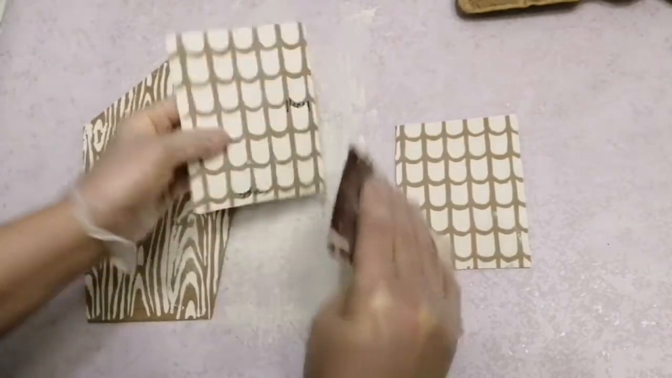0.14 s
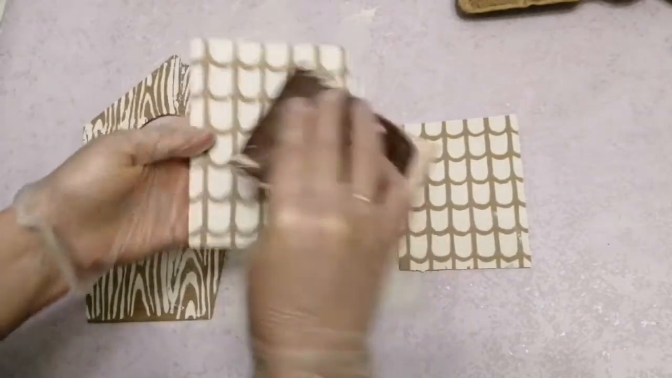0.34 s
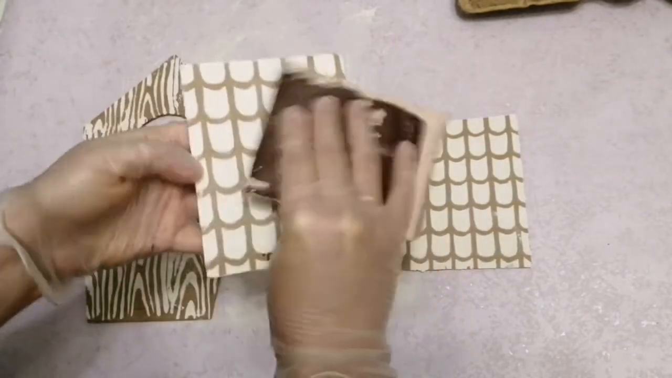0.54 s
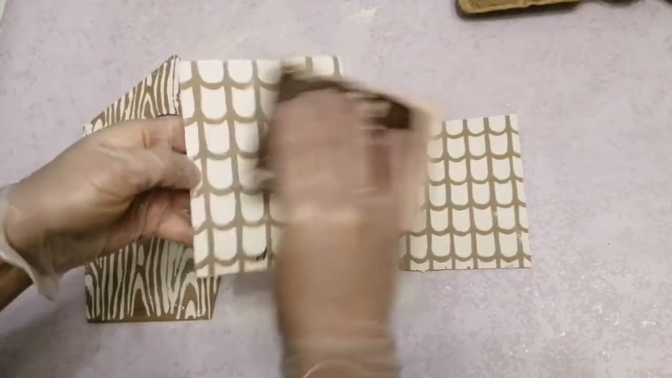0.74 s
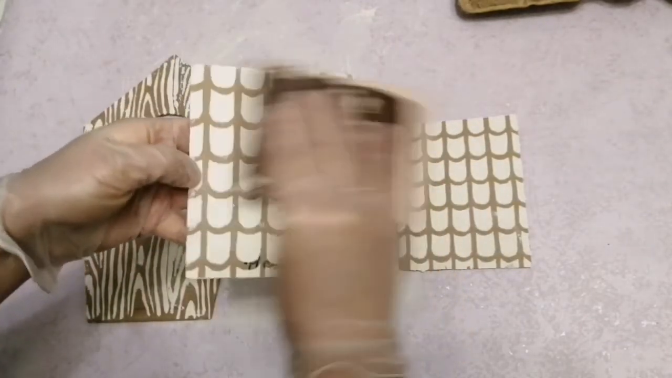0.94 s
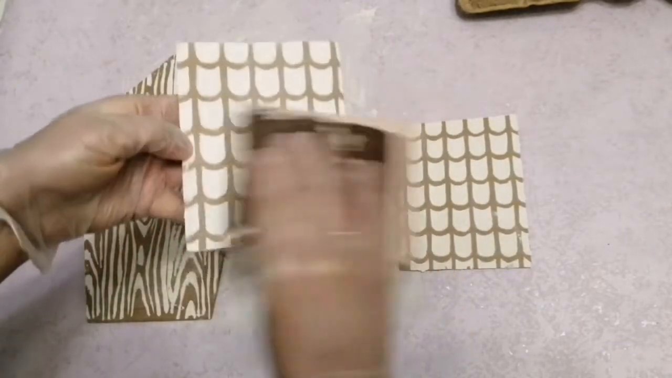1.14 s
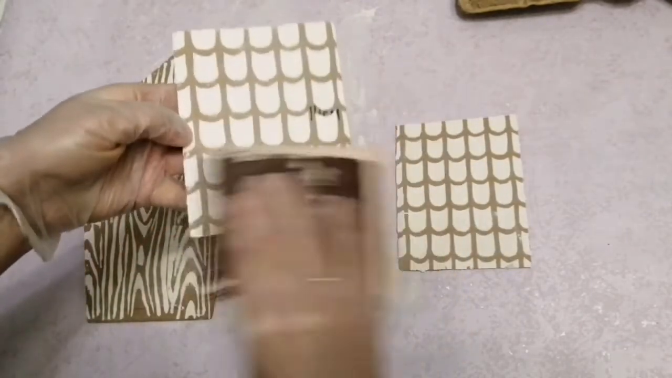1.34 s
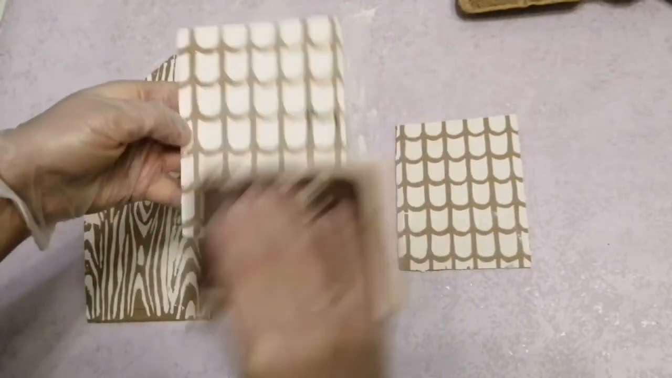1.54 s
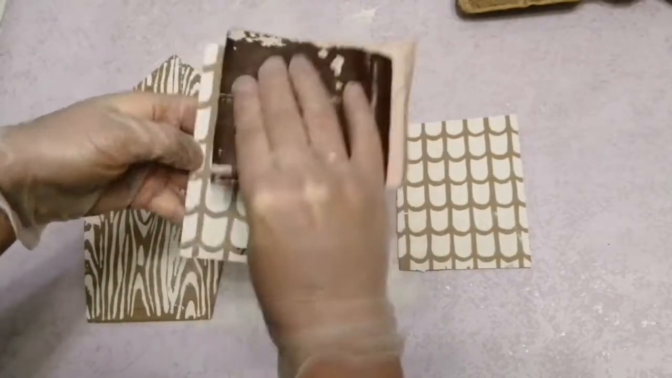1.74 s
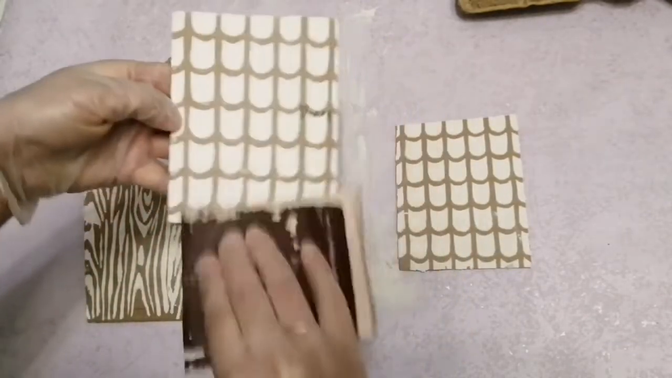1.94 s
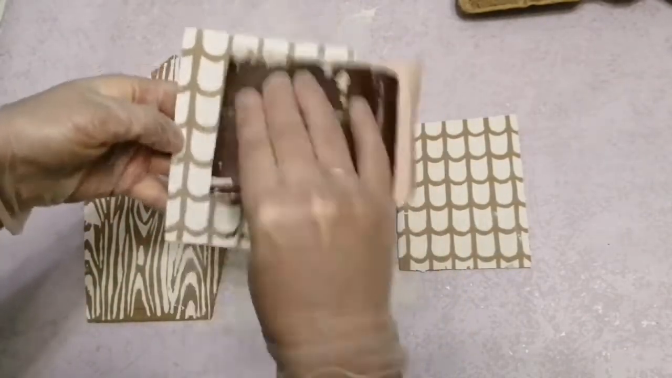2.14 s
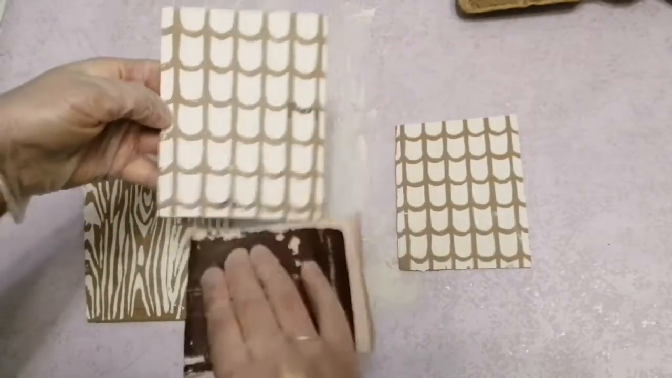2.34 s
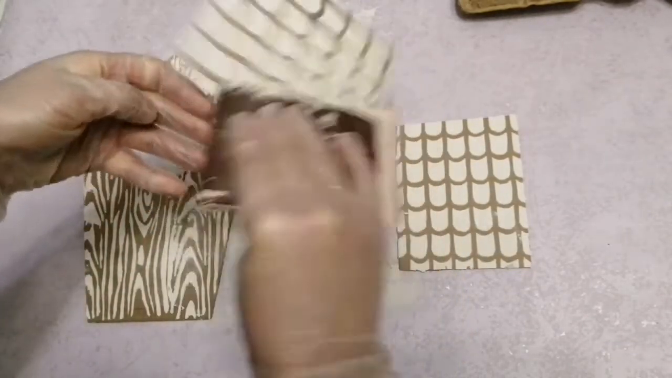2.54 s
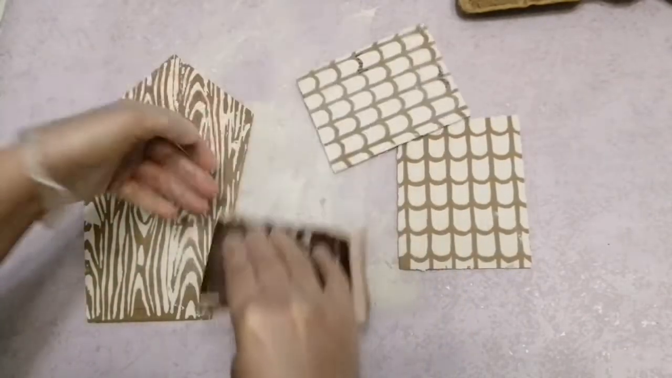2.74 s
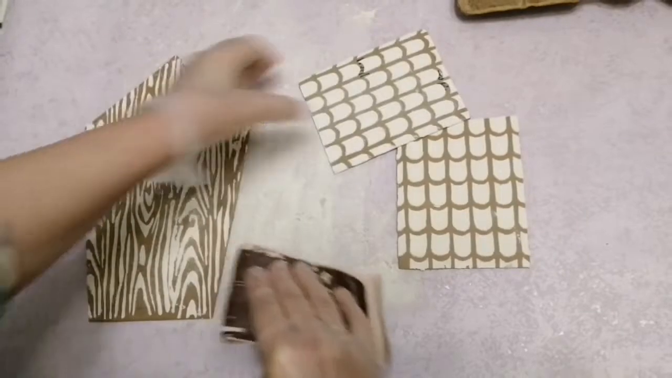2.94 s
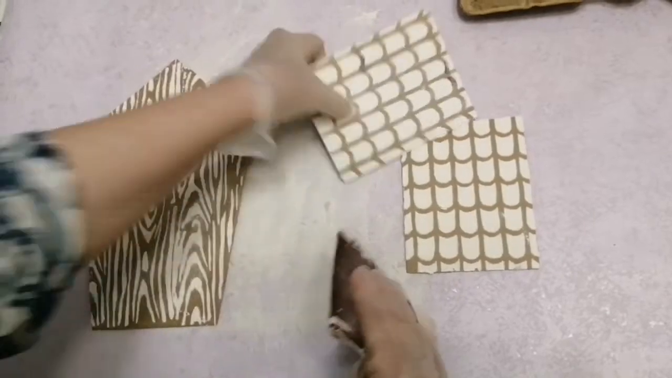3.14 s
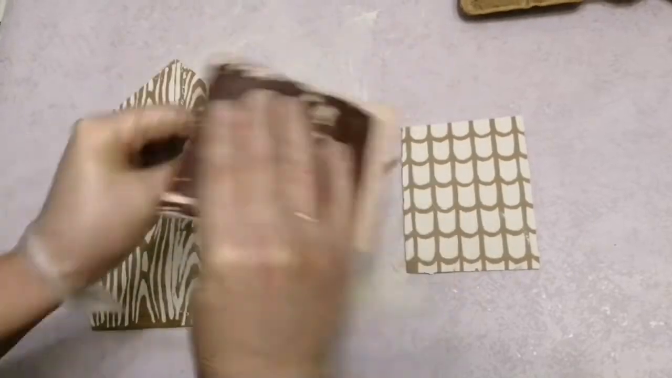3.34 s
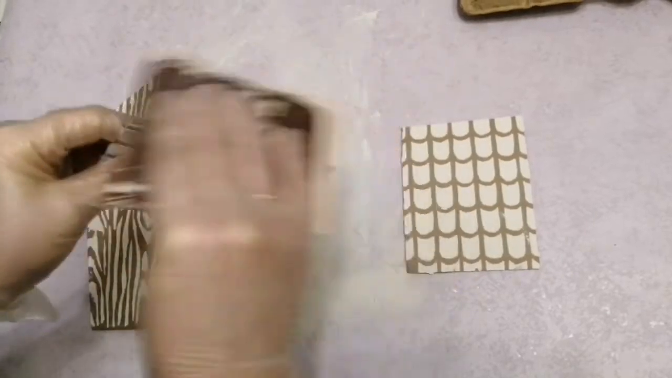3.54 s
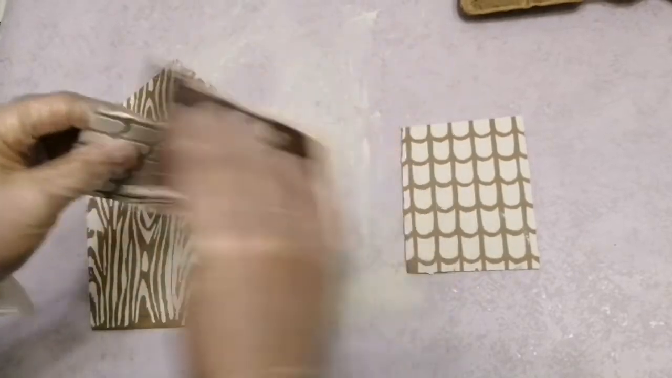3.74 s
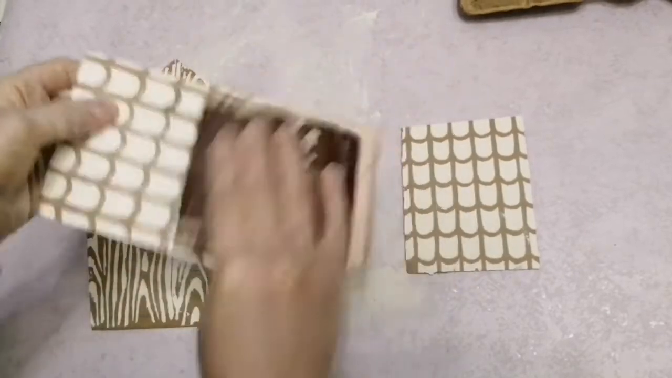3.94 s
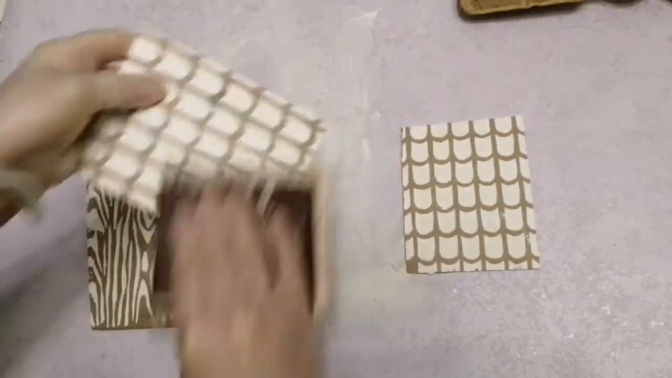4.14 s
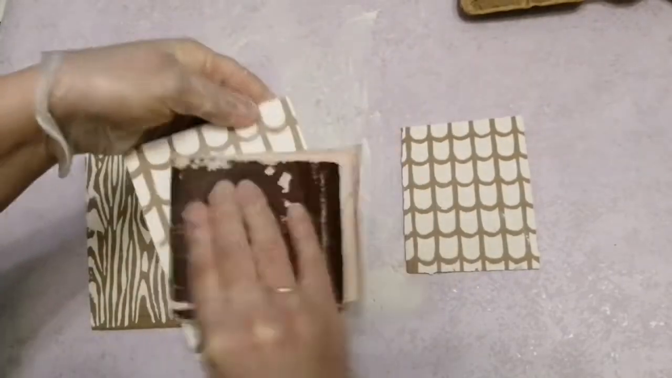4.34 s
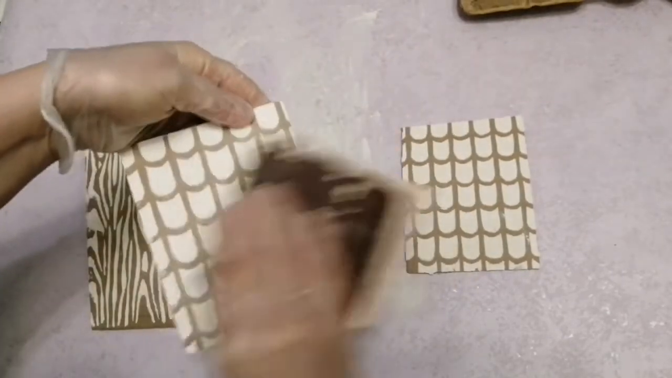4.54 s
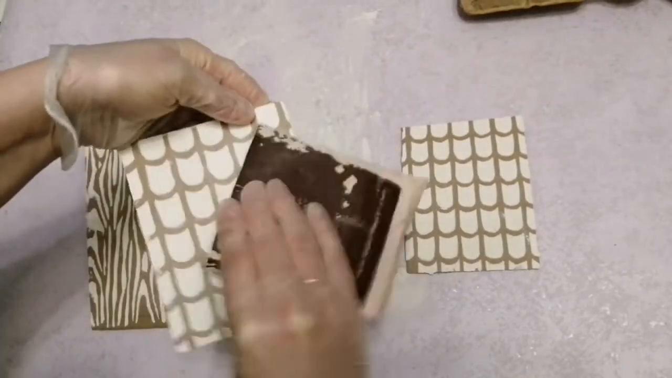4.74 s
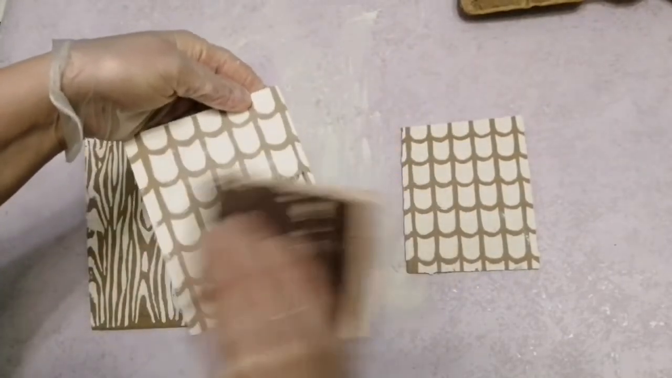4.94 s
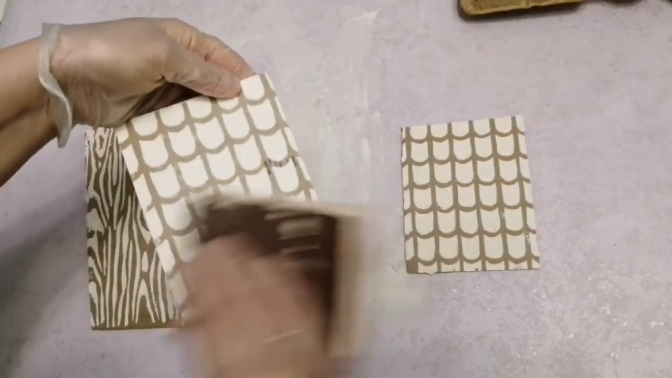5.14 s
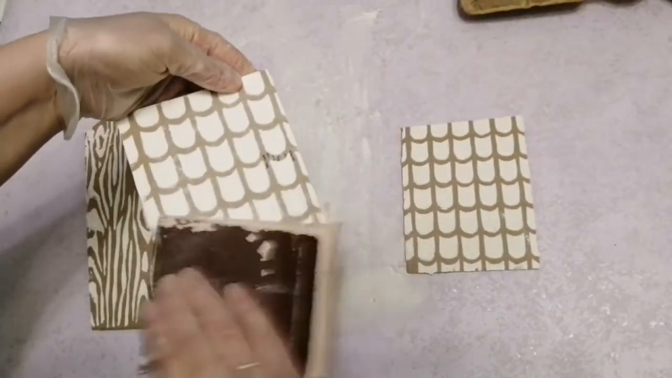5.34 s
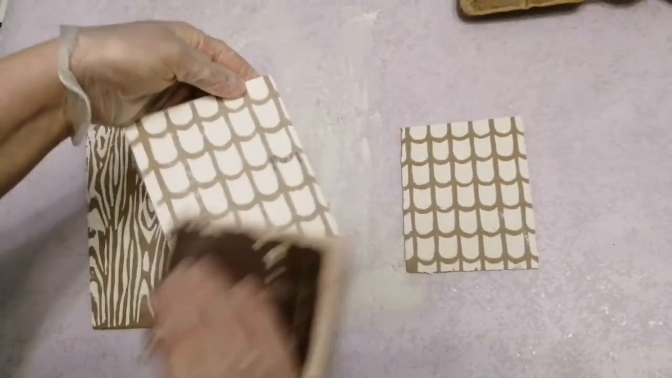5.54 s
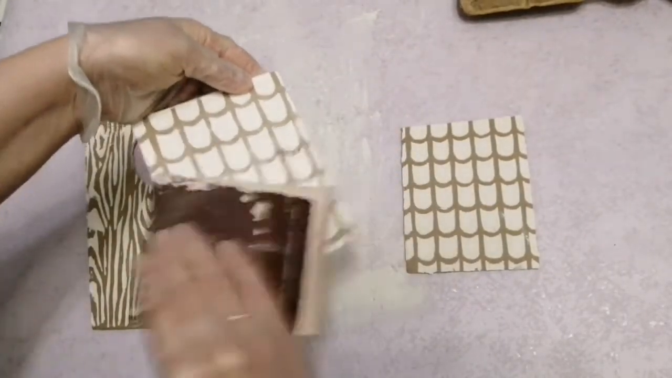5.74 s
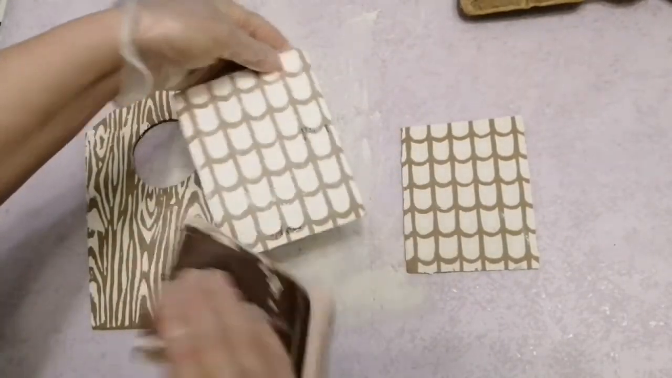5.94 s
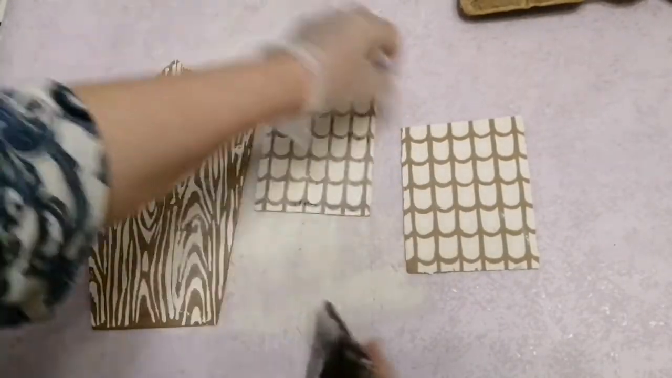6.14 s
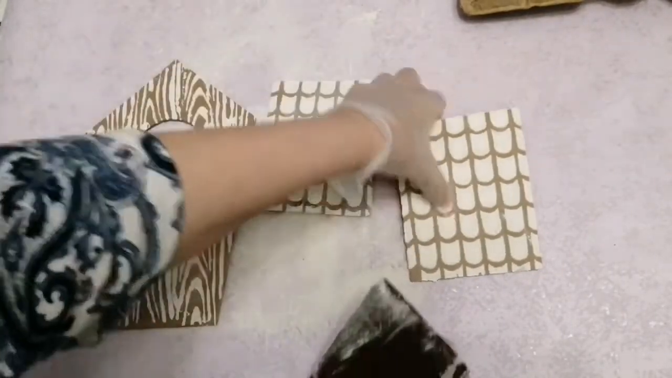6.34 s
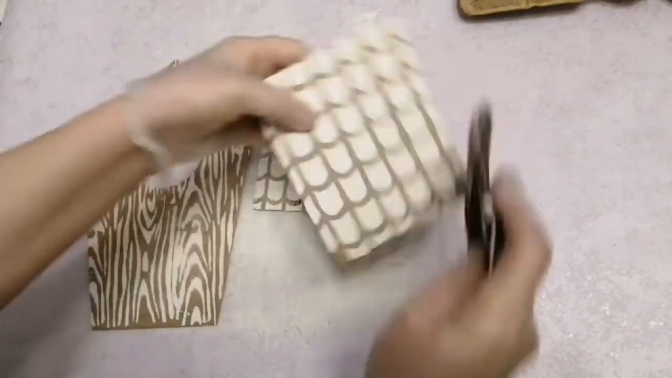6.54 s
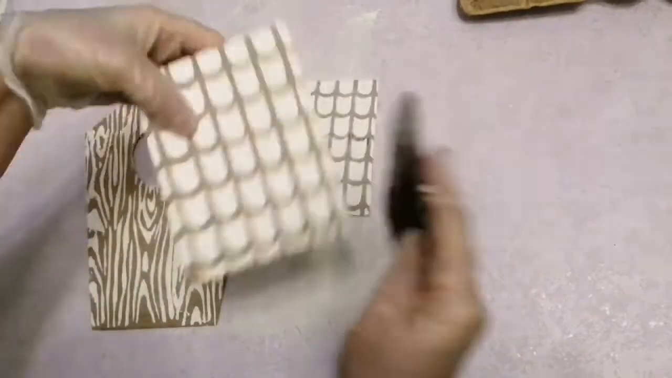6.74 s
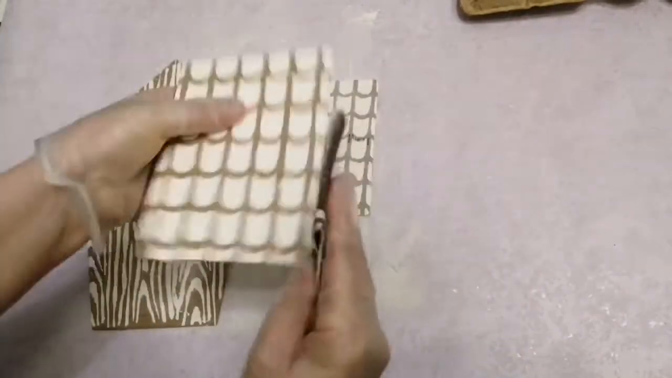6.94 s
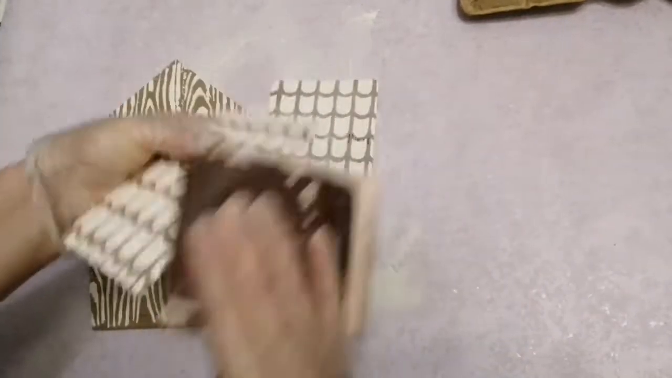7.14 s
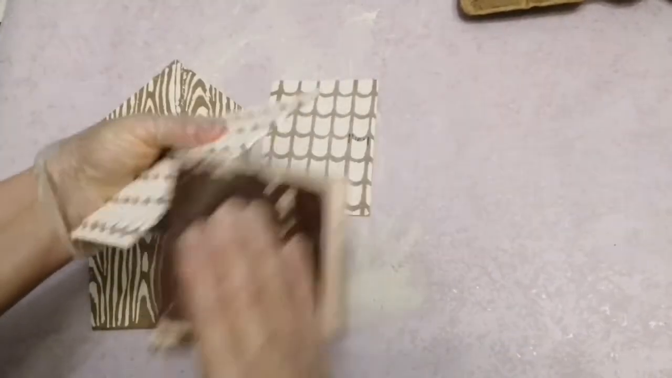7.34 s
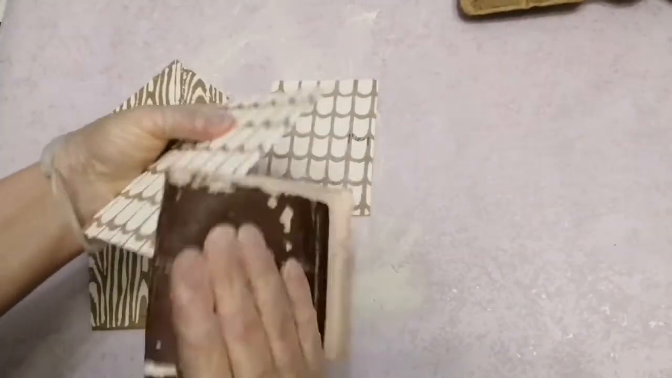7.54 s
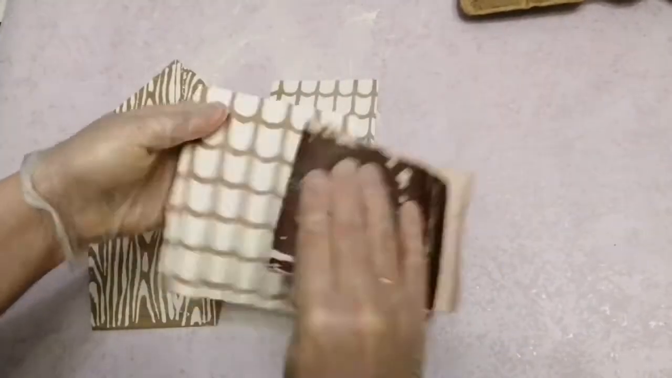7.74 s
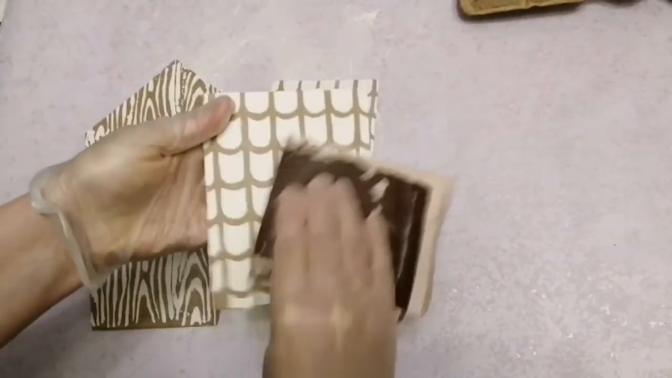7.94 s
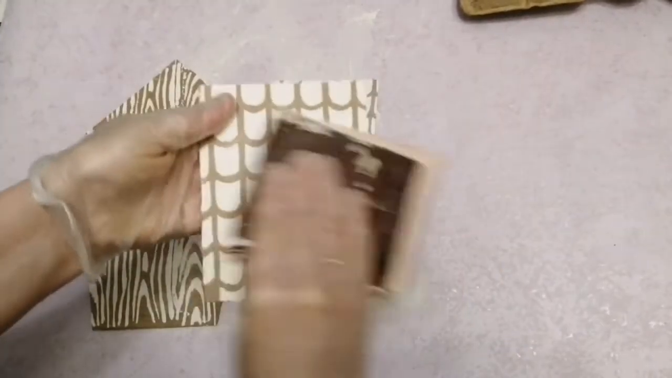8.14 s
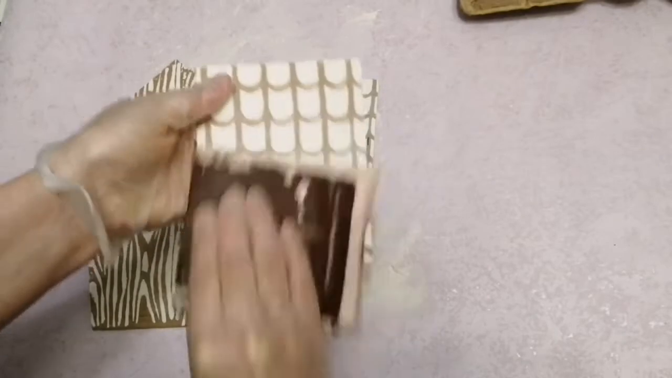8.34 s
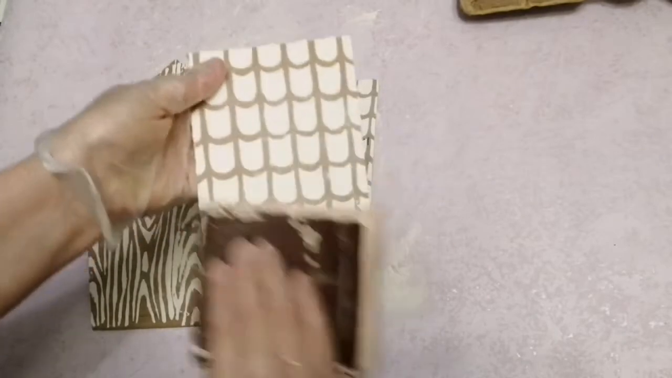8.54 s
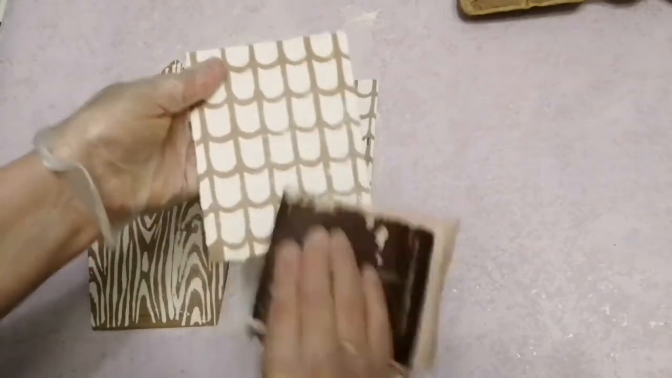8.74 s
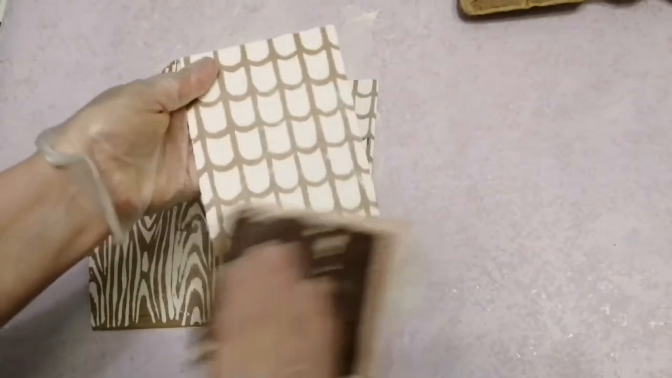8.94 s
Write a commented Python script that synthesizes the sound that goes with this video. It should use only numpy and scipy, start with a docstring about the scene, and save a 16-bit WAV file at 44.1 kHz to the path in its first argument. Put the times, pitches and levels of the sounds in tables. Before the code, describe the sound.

Close stereo sound from above a table in a small quiet room. Sandpaper rubs puttied cardboard in dry, grainy hissing strokes, quick at first, then slower and longer. A pause brings knocks and sliding card. Separate short scrapes follow, then a very fast scrubbing run, another quiet pause with faint handling, and a last bout of uneven, medium-paced strokes.

```python
"""A dry, grainy hiss swells and fades with each stroke of sandpaper over dried putty on cardboard.
Friction breaks many tiny grains loose: the grains hiss, the sheet rasps and the card drums beneath.
Around the bouts of rubbing come light slides, knocks, low drones, ticks of grit and a faint squeak.
Decaying modes make the knocks, filtered noise the drones, and a wavering sine the squeak.
A small room adds reflections and still air; a microphone with two ports hears it all from above."""
import sys
import numpy as np
from scipy import signal
from scipy.fft import rfft, irfft, next_fast_len
from scipy.io import wavfile

SR = 44100
rng = np.random.default_rng(int(sys.argv[2]) if len(sys.argv) > 2 else 0)


def log_audio(samples):
    """Write samples as a 16-bit WAV file to the path given in sys.argv[1]."""
    # one column per channel
    frames = np.atleast_2d(samples).T
    # limit to full scale, then quantise
    limited = np.clip(frames, -1, 1)
    pcm = np.round(limited * 32767).astype(np.int16)
    wavfile.write(sys.argv[1], SR, pcm)


N = 396018
TIME = np.arange(N) / SR  # s
SIZE = next_fast_len(N + SR // 10, real=True)  # padded transform length, samples
FREQ = np.maximum(np.fft.rfftfreq(SIZE, 1 / SR), 1)  # Hz
BODY_HZ, HISS_HZ = 827, 3850  # where card body, rasp and hiss meet

# strokes of the sandpaper, each lasting to the next turn or stop: start_s [s], level_db [relative dB]
STROKE_TABLE = [(0.39, -38.5), (0.489, -31.5), (0.604, -33), (0.713, -33.5), (0.818, -31), (0.921, -29.5),
                (1.028, -28.0), (1.143, -27.5), (1.231, -27.5), (1.349, -26.5), (1.42, -28), (1.795, -27.5),
                (2.206, -27), (3.398, -36.5), (3.587, -35), (3.75, -31), (3.955, -28), (4.129, -28.5),
                (4.333, -29.5), (4.382, -32), (4.486, -34.5), (4.56, -29), (4.608, -31), (4.676, -31),
                (4.738, -32.5), (4.785, -33.5), (4.844, -29.5), (4.882, -30), (4.953, -29.5),
                (5.004, -31.5), (5.065, -29), (5.119, -28.5), (5.165, -29.5), (5.219, -31), (5.272, -28),
                (5.315, -30), (5.372, -30.5), (5.419, -33), (5.469, -32.5), (5.503, -33), (5.571, -34),
                (5.616, -30.5), (5.663, -37.5), (5.725, -29.5), (5.77, -30), (5.802, -33.5), (7.011, -41),
                (7.087, -40), (7.233, -34.5), (7.336, -34.5), (7.477, -38.5), (7.583, -33.5),
                (7.826, -31.0), (7.914, -30), (7.976, -29.5), (8.153, -27.5), (8.309, -30), (8.477, -29),
                (8.632, -32.5), (8.783, -35), (8.869, -28), (8.92, -35.5)]
# moments when the hand comes to rest: stop_s [s]
HAND_STOPS = [1.54, 2.015, 2.395, 3.507, 3.671, 3.842, 4.041, 4.215, 5.883, 7.7, 9.058]
# how the held card answers the rubbing, damped when pressed on the table:
# time_s [s], rasp_db [dB], body_db [dB], middle_ring_db [dB, BODY_HZ to 2 kHz], upper_ring_db [dB, above]
CARD_HOLD = [(.4, -1.5, -2.5, 3, -6), (1.2, -1, -2, 0.5, 5), (2.3, -0.5, -2, 3, 5), (3.45, 1, 3, -19, 5),
             (4.2, 0, 2.5, -6, -15), (4.45, -2.5, -9, -6, -10.5), (5.9, -2.5, -6, -0.5, -6),
             (7.1, -0.5, 4, 6.5, -5), (7.65, -1, 0.5, 12.5, -5), (8.05, 0, 0, -3, 2.5),
             (9, -1, -0.5, 8.5, -5)]
# a firmer stroke mainly hisses more: rasp and body rise by these dB per dB from their usual levels
USUAL_DB, RASP_DB, RASP_RISE, BODY_DB, BODY_RISE = -30.5, -34, 0.76, -47, 0.15
TURN_SHARE = 0.052  # the hand swings round in an oval: a turning stroke runs on by this share of its length


def strokes():
    """Reciprocating friction: the force of each stroke and the hold of the card set its balance."""
    turns = np.sort([start for start, db in STROKE_TABLE] + list(HAND_STOPS))
    rows = []
    for start, hiss_db in STROKE_TABLE:
        end = turns[turns > start][0]
        hold_rasp_db, hold_body_db = curve(CARD_HOLD, (start + end) / 2)[:2]
        force_db = hiss_db - USUAL_DB
        if end not in HAND_STOPS:
            end += TURN_SHARE * (end - start)
        rasp_db = RASP_DB + RASP_RISE * force_db + hold_rasp_db
        body_db = BODY_DB + BODY_RISE * force_db + hold_body_db
        rows.append((start, end, hiss_db, rasp_db, body_db))
    return rows


# light sliding on the table, of a piece or the resting sheet:
# start_s [s], end_s [s], level_db [relative dB], hiss_db [dB above level_db]
SLIDE_TABLE = [(0.11, 0.437, -61, 9), (2.405, 2.558, -48.5, 1), (2.567, 2.716, -61.5, 6),
               (2.69, 2.716, -38, -0.5), (2.712, 2.8, -43, -4.5), (2.74, 2.89, -50, -8.5),
               (3.049, 3.184, -49.5, 0), (3.168, 3.213, -49.5, 1), (3.18, 3.333, -74.5, 21),
               (6.105, 6.18, -55.5, -4), (6.27, 6.354, -57, 0.5), (6.346, 6.413, -48, 0),
               (6.417, 6.525, -47.5, 2), (6.518, 6.66, -56, 3.5), (6.808, 6.84, -41.5, -4),
               (6.83, 6.901, -50, 1.5), (6.953, 6.99, -44.5, -5.5), (7.715, 7.79, -66.5, 14.5)]
SLIDE_BODY_DB = -5.5  # drumming of the card, relative to the level of a slide


def slides():
    """Light sliding friction: hiss and rasp, with the card drumming softly beneath."""
    return [(start, end, db + hiss_db, db, db + SLIDE_BODY_DB) for start, end, db, hiss_db in SLIDE_TABLE]


# where on the table the work is done: time_s [s], pan_db [left minus right dB]
WORK_PLACE = [(.7, 1), (1.4, -1), (2.3, -1), (2.5, -2), (2.73, 2), (3.1, 0), (3.5, -1), (4.4, 0),
              (4.55, -5), (5.85, -6.5), (6.2, -14), (6.5, -8), (6.85, -5), (7.7, -1.5), (8.35, -4.5),
              (8.9, -1.5)]
# power of the speed that sets the loudness: one exponent each for hiss, rasp and card body [no unit]
SPEED_POWERS = (2.37, 1.89, 1.33)
OVERLAP_S = 0.0048  # part of the sheet still slides while the hand turns round
FASTEST = 0.41  # share of a stroke before its top speed
# the soft pad creeps on for a time, plus a share of the stroke's length
RUN_OUT_DB, RUN_OUT_S, RUN_OUT_SHARE = -9, 0.0073, 0.064


def rub(moves):
    """Friction power grows as a power of sliding speed; gives hiss, rasp and body amplitudes per port."""
    power = np.zeros((3, N))
    for start, end, *levels_db in moves:
        length = end - start
        marks = [start - OVERLAP_S, start + FASTEST * length, end + OVERLAP_S]
        span = slice(max(int(marks[0] * SR), 0), int(marks[2] * SR) + SR // 4)
        phase = np.interp(TIME[span], marks, [0, .5, 1])
        speed = np.abs(np.sin(np.pi * phase))
        work = speed ** np.array(SPEED_POWERS)[:, None]
        keep = np.exp(-1 / (SR * (RUN_OUT_S + RUN_OUT_SHARE * length)))
        creep = signal.lfilter([1 - keep], [1, -keep], work)
        work = work + undb(RUN_OUT_DB) ** 2 * creep
        power[:, span] += undb(levels_db)[:, None] ** 2 * work
    hiss, rasp, body = power
    pan_db = curve(WORK_PLACE, TIME)[0]
    sides = undb([pan_db, -pan_db])  # power gains
    sides = sides / sides.mean(axis=0)
    return np.sqrt([hiss * sides, rasp * sides, [body, body]])  # the hand shades the short waves only


# colour radiated by sheet and card: frequency_hz [Hz], gain_db [dB]
SCRAPE_COLOUR = [(100, -25.5), (200, -17.5), (360, -4.5), (600, -4), (900, -13.5), (1600, -9.5),
                 (3000, -3.5), (3950, -14), (5300, -1.5), (6900, -1.5), (10700, -12), (13800, -14.5),
                 (14900, -8.5), (15800, -18)]
# bending resonances of sheet and card under the hand: pitch_hz [Hz], width_hz [Hz], gain_db [dB]
BENDING_MODES = [(413, 120, -11.5), (542, 160, -14), (1206, 1050, -9.5), (1620, 130, -3.5),
                 (2340, 150, -7.5), (3320, 330, -8.5), (5200, 450, -12.5), (7840, 2300, -17.5)]


def scrape(drives, grain_rate, grain_db, catch_db, catch_rate, ridge_db, judder_db, wander_db,
           hiss_db, rasp_db, body_db, spread):
    """Impulsive excitation: unequal tiny fractures, bunched by surface ridges, drive sheet and card."""
    sizes = undb(grain_db * np.minimum(rng.exponential(size=(3, N)), 4))
    breaks = rng.random((3, N)) < grain_rate / SR  # grain_rate in fractures per second
    grains = rng.uniform(-0.93, 1, (3, N)) * sizes * breaks
    # the contact patch is wide: at short wavelengths each port hears other grains
    apart = np.clip(spread, 0, 1) * (1 - below(1370, order=1) ** 2)
    sound = shape(grains[0], np.sqrt(1 - apart)) + shape(grains[1:], np.sqrt(apart))
    # as the contact travels over the card, each resonance comes and goes
    middle_db, upper_db = curve(CARD_HOLD, TIME)[2:]
    for hz, width, db in BENDING_MODES:
        free_db = 0 if hz < BODY_HZ else middle_db if hz < 2000 else upper_db
        ring_gain = undb(db + free_db + wander_db * walk(16))
        sound = sound + ring_gain * resonate(grains[0], hz, width)
    catches = catch_db * walk(catch_rate) + ridge_db * walk(45)
    flutter = [catches, catches + judder_db * walk(60), catches + 2 * judder_db * walk(70)]
    # split into hiss, rasp and body with matching power at the crossings
    body, rasp_top, radiated = below(BODY_HZ), below(HISS_HZ), colour(SCRAPE_COLOUR)
    bands = [np.sqrt(1 - rasp_top ** 2), rasp_top * np.sqrt(1 - body ** 2), body]
    out = 0
    for band, wobble_db, db, drive in zip(bands, flutter, (hiss_db, rasp_db, body_db), drives):
        texture = unit(shape(sound, band * radiated) * undb(wobble_db))
        out = out + undb(db) * drive * texture
    return out


# the padded sheet lands on the card: start_s [s], level_db [relative dB], pitch_hz [Hz, of the thump]
LANDING_TABLE = [(.392, -51, 250), (2.18, -31, 300), (2.49, -39, 228), (3.219, -50, 216), (3.377, -44, 385),
                 (3.571, -42.5, 375), (3.593, -35, 367), (3.744, -41, 384), (3.947, -36.5, 643),
                 (3.958, -35.5, 510), (4.13, -48, 503), (7.79, -48.5, 195)]
LANDING_CLACK_DB, LANDING_TICK_DB, LANDING_PAN_DB = -15.5, -24.5, 4  # re thump; pan is left minus right


def landings():
    """Damped impact: the pad softens the blow to a dull thump and damps the card."""
    blows = [(s, db + LANDING_TICK_DB, db, db + LANDING_CLACK_DB, hz, LANDING_PAN_DB)
             for s, db, hz in LANDING_TABLE]
    return knocks(blows, ring_db=-16.5, thump_t60=0.022, table_db=-6.5)


# a piece knocks on the table or the edge of the sheet:
# start_s [s], thump_db [relative dB], clack_db [relative dB]
TAP_TABLE = [(1.752, -30.5, -37.5), (2.327, -33.5, -44), (2.357, -32.5, -37), (2.508, -41.5, -40.5),
             (2.602, -39.5, -45.5), (2.691, -37.5, -33.5), (2.730, -34.5, -28.5), (2.745, -43, -36),
             (2.813, -51, -45), (3.181, -40, -37.5), (6.114, -48, -53), (6.136, -58, -47),
             (6.199, -77, -59), (6.267, -49.5, -51.5), (6.365, -49.5, -40), (6.483, -38.5, -40),
             (6.824, -39.5, -35.5), (7.033, -53, -29), (7.105, -53, -40), (7.175, -35, -30)]
TAP_HZ, TAP_TICK_DB = 390, -6  # pitch of the thump; tick relative to the clack


def taps():
    """Hard impact: bare cardboard clacks, and rings more freely."""
    blows = [(s, clack_db + TAP_TICK_DB, thump_db, clack_db, TAP_HZ, curve(WORK_PLACE, s)[0])
             for s, thump_db, clack_db in TAP_TABLE]
    return knocks(blows, ring_db=-9.5, thump_t60=0.015, table_db=-9.5)


# coarse grit snags on the edge of the card: start_s [s], level_db [relative dB]
SNAG_TABLE = [(1.443, -26.5), (3.968, -32), (4.502, -43), (4.57, -32), (5.686, -30), (5.728, -40),
              (6.635, -49.5), (7.105, -47), (7.841, -42)]
SNAG_CLACK_DB, SNAG_THUMP_DB = -16, -40  # relative to the tick of the grit


def snags():
    """Sudden release: a large grain breaks free with a bright tick that hardly moves the card."""
    blows = [(s, db, db + SNAG_THUMP_DB, db + SNAG_CLACK_DB, TAP_HZ, curve(WORK_PLACE, s)[0])
             for s, db in SNAG_TABLE]
    return knocks(blows, ring_db=-30, thump_t60=0.017, table_db=-13)


# modes of a cardboard piece: pitch_hz [Hz], level_db [dB re blow], t60_s [s, decay by 60 dB]
CARD_RINGING = [(223, -3, .14), (327, -11.5, 0.32), (418, -4, 0.17), (475, 2.5, 0.16), (677, -10, 0.092),
                (905, -11, 0.23), (1230, -23, 0.13), (1810, 1.5, 0.066), (2800, -11, .06), (3440, 2, 0.045)]


def knocks(blows, ring_db, thump_t60, table_db, clack_t60=0.018, tick_t60=0.021, thump_db=10, clack_db=6,
           tick_db=6, table_hz=150, table_t60=0.037):
    """Modal impact: a hand-damped thump, a clack and a tick of grit, while the card rings in its modes."""
    t = np.arange(SR // 3) / SR
    fade = lambda t60: np.exp(-np.log(1000) * t / t60)
    clack_band = signal.butter(3, [1000, 3400], "band", fs=SR, output="sos")
    tick_band = signal.butter(1, [4500, 8000], "band", fs=SR, output="sos")
    out = np.zeros((2, N))
    for s, tick, thump, clack, hz, pan_db in blows:
        noise = rng.standard_normal((2, len(t)))
        # the air follows the card's velocity: it is pushed and drawn back alike
        bend = np.sin(2 * np.pi * hz * t) * fade(thump_t60) * (1 - fade(0.004))
        sound = -undb(thump + thump_db) * np.gradient(bend, t) / (2 * np.pi * hz)
        # the table gives beneath it
        sound += undb(thump + table_db) * np.sin(2 * np.pi * table_hz * t) * fade(table_t60)
        sound += undb(clack + clack_db) * unit(signal.sosfilt(clack_band, noise[0])) * fade(clack_t60)
        sound += undb(tick + tick_db) * unit(signal.sosfilt(tick_band, noise[1])) * fade(tick_t60)
        for mode_hz, db, t60 in CARD_RINGING:
            # the grip detunes a mode, the place of the blow sets its share
            grip, place = rng.uniform(-1.22, 1, 2)
            blow = thump if mode_hz < BODY_HZ else clack
            ring = np.cos(2 * np.pi * mode_hz * (1 + 0.059 * grip) * t) * fade(t60)
            sound += undb(blow + db + ring_db + 4 * place) * ring
        add(out, s, np.outer(undb([pan_db / 2, -pan_db / 2]), sound))
    return out


# a dragged piece drones on its low bending modes, the table rumbles under the hands:
# start_s [s], end_s [s], pitch_hz [Hz], width_hz [Hz, of each filter pass], level_db [relative dB]
DRONE_TABLE = [(-.06, 0.157, 270, 50, -51), (-.06, 0.143, 377, 52, -55.5), (-.04, 0.168, 89.5, 130, -58),
               (0.36, .5, 90, 130, -55.5), (2.462, 2.56, 75, 110, -49.5), (2.463, 2.683, 218, 22, -56.5),
               (2.677, 2.876, 377, 130, -55), (2.647, 2.85, 111, 160, -58.5),
               (5.895, 6.364, 136, 125, -61.5), (6.385, 6.65, 129, 150, -62)]


def drones():
    """Friction-driven resonance: a low mode keeps sounding, in fits, as long as the piece moves."""
    out = 0
    for start, end, hz, width, db in DRONE_TABLE:
        ringing = resonate(resonate(rng.standard_normal(N), hz, width), hz, width)
        out = out + undb(db + 3.2 * walk(45)) * swell(start, end) * unit(ringing)
    return out


# the sheet squeaks faintly on the card:
# start_s [s], end_s [s], first_hz [Hz], last_hz [Hz], level_db [relative dB]
SQUEAK_TABLE = [(1.63, 1.75, 4330, 4200, -65)]


def squeaks():
    """Stick and slip, fast enough to be a thin wavering tone."""
    out = 0
    for start, end, first_hz, last_hz, db in SQUEAK_TABLE:
        hz = np.interp(TIME, [start, end], [first_hz, last_hz]) * (1 + .006 * walk(150))
        tone = np.sin(2 * np.pi * np.cumsum(hz) / SR)
        out = out + undb(db + 3 * walk(60)) * swell(start, end) * tone
    return out


def room(x, early_db=-11, early_t60=0.033, late_db=-12, late_t60=0.24):
    """Reverberation: quick reflections from table and hands, then the short tail of the walls."""
    t = np.arange(SR // 2) / SR
    echoes = 0
    # the moving arm keeps changing the paths, so two sets of reflections take turns
    angle = np.pi * walk(1.5)
    for share in (np.cos(angle), np.sin(angle)):
        response = 0
        for db, t60, gap_s in ((early_db, early_t60, .0005), (late_db, late_t60, .007)):
            tail = rng.standard_normal((2, len(t))) * np.exp(-np.log(1000) * t / t60) * (t > gap_s)
            response = response + undb(db) * unit(tail) / np.sqrt(len(t))
        echoes = echoes + signal.fftconvolve(x * share, response, axes=1)[:, :N]
    # long waves stay direct
    return x + shape(echoes, below(13000, order=1) * np.sqrt(1 - below(140, order=1) ** 2))


# still air of the room: frequency_hz [Hz], gain_db [dB]
AIR_COLOUR = [(15, -27), (25, -5.5), (173, -8), (274, -7.5), (378, -5.5), (895, -15), (2770, -13),
              (4040, -20), (5140, -12), (6920, -13.5), (9550, -21.5), (15500, -24.5)]
AIR_DB = -62.5  # middle of the wavering level, before the microphone


def air():
    """Partly coherent noise: faint room air, its bass much alike in both ports."""
    noise = rng.standard_normal((3, N))
    shared = np.clip(0.68 * below(900, order=1), 0, 1)
    tint = colour(AIR_COLOUR)
    sound = shape(noise[0], shared * tint) + shape(noise[1:], np.sqrt(1 - shared ** 2) * tint)
    return undb(AIR_DB + 1.0 * walk(3.02)) * unit(sound)


def undb(db):
    """Logarithmic level: decibels to amplitude gain."""
    return 10 ** (np.asarray(db) / 20)


def unit(x):
    """Normalised power: scale to rms 1."""
    return x / np.sqrt(np.mean(x ** 2))


def colour(points):
    """Spectral envelope: gain at every frequency, interpolated over log frequency from (Hz, dB) points."""
    hz, db = np.transpose(points)
    return undb(np.interp(np.log(FREQ), np.log(hz), db))


def shape(x, gain):
    """Linear filtering: multiply the spectrum by a gain at every frequency."""
    return irfft(rfft(x, SIZE) * gain, SIZE)[..., :N]


def below(hz, order=8):
    """Low-pass response: Butterworth amplitude gain."""
    return 1 / np.sqrt(1 + (FREQ / hz) ** (2 * order))


def resonate(x, hz, width):
    """Resonance: one peak filter, gain 1 at its centre."""
    return signal.lfilter(*signal.iirpeak(hz, hz / width, fs=SR), x)


def walk(rate):
    """Random modulation: straight lines between random values within +-2, rate values a second."""
    knots = rng.uniform(-2, 2, N // 20)
    return np.interp(TIME * rate, np.arange(len(knots)), knots)


def swell(start, end):
    """Amplitude envelope: half a sine between two times, silence outside."""
    return np.sin(np.pi * np.clip((TIME - start) / (end - start), 0, 1))


def curve(table, s):
    """Linear interpolation: every column of a control curve at time s."""
    times, *columns = np.transpose(table)
    return np.array([np.interp(s, times, column) for column in columns])


def add(track, s, sound):
    """Superposition: mix a short sound in at time s."""
    i = int(s * SR)
    track[:, i:i + sound.shape[1]] += sound[:, :N - i]


def scene():
    """Superposition of sanding, handling and knocks in the room, over its still air."""
    sanding = scrape(rub(strokes()), grain_rate=25000, grain_db=2.5, catch_db=1.5, catch_rate=220, ridge_db=.5,
                     judder_db=1.0, wander_db=5.5, hiss_db=-1.0, rasp_db=-1.0, body_db=-2.5, spread=1.0)
    handling = scrape(rub(slides()), grain_rate=8000, grain_db=3.5, catch_db=0.0, catch_rate=420, ridge_db=1.1,
                      judder_db=4.5, wander_db=1.5, hiss_db=-1.0, rasp_db=-2.0, body_db=-2.5, spread=1.0)
    impacts = landings() + taps() + snags()
    return room(sanding + handling + impacts + drones() + squeaks()) + air()


# the two microphone ports: frequency_hz [Hz], difference_db [left minus right dB]
PORT_COLOUR = [(300, 0), (600, 4), (950, -4.5), (1650, 0), (2100, -1.2), (3800, 2), (5200, -4), (6400, -6),
               (7800, 7.5), (8700, 5.5), (11000, 1.5), (15000, -3.5)]
PORT_LAG_S, TOP_HZ = .00015, 15800  # delay of the right port; upper cut-off


def record(dry):
    """Interaural-like differences: each port has its own colour, the right lags, and the top is cut."""
    tilt = np.sqrt(colour(PORT_COLOUR))  # half the difference goes to each port
    lag = np.exp(-2j * np.pi * FREQ * PORT_LAG_S)
    ports = np.array([tilt, lag / tilt]) / np.sqrt((tilt ** 2 + tilt ** -2) / 2)
    top_cut = signal.ellip(10, .2, 80, TOP_HZ, fs=SR, output="sos")
    return signal.sosfilt(top_cut, shape(dry, ports))


dry = scene()
out = record(dry)
log_audio(out)
```